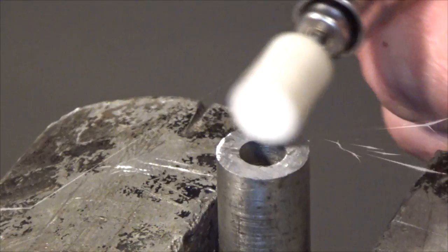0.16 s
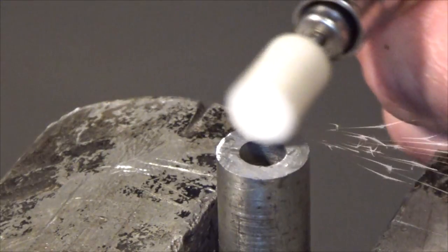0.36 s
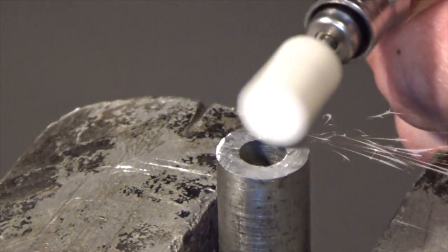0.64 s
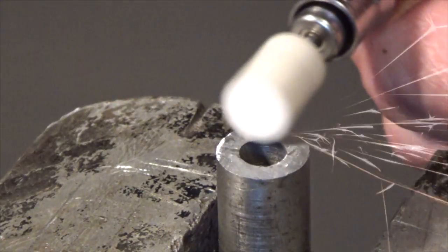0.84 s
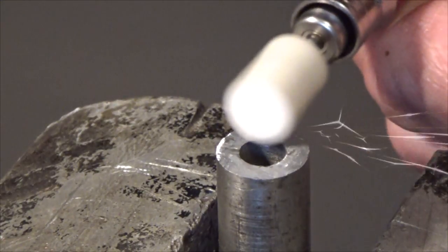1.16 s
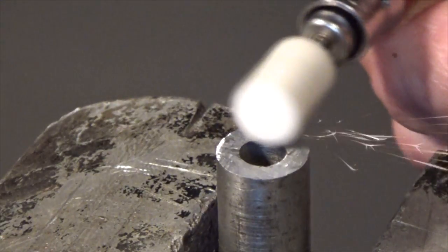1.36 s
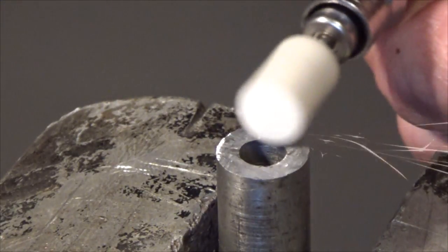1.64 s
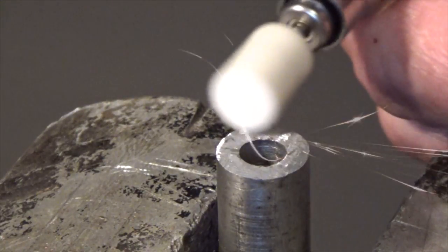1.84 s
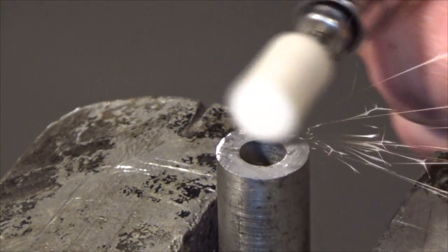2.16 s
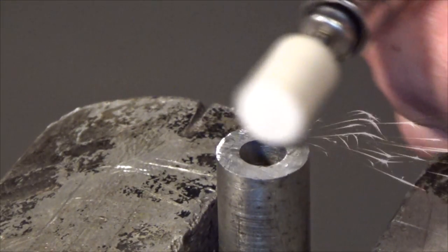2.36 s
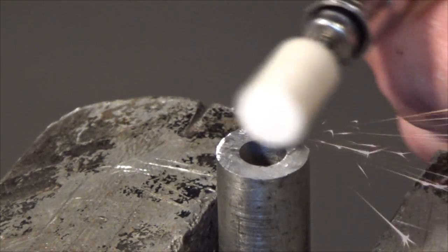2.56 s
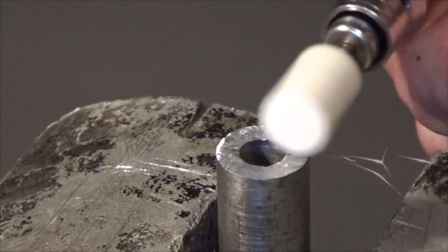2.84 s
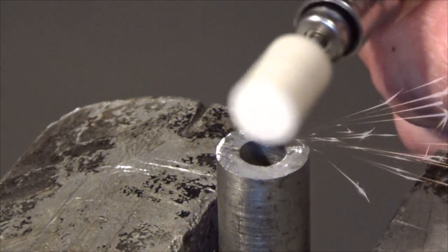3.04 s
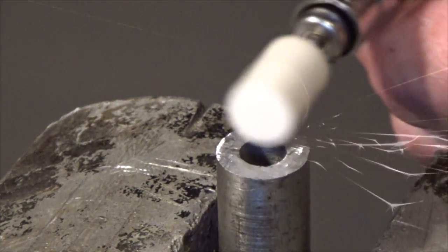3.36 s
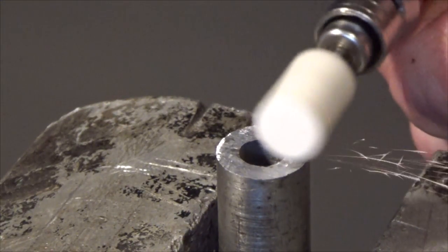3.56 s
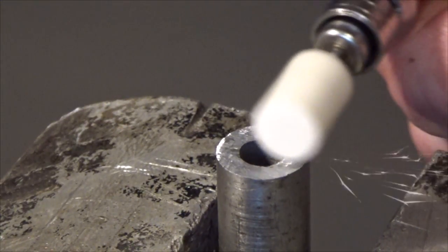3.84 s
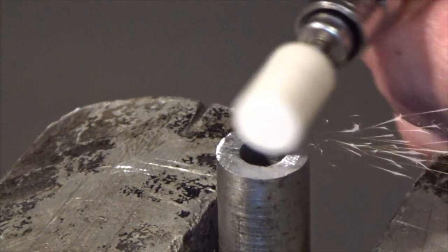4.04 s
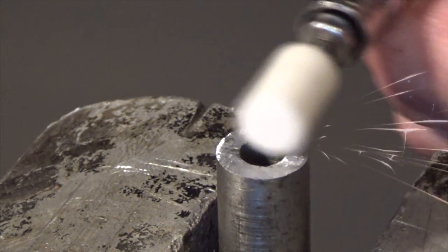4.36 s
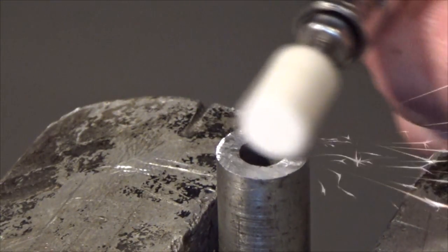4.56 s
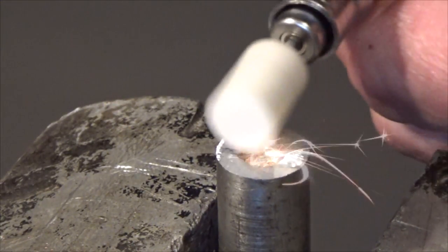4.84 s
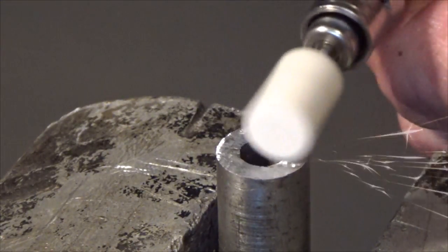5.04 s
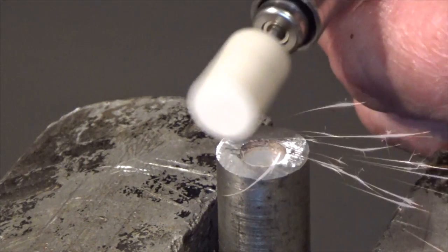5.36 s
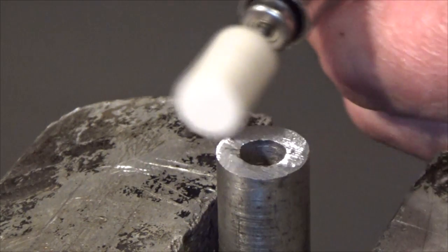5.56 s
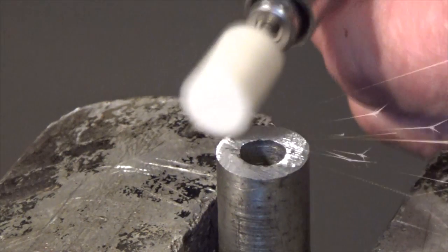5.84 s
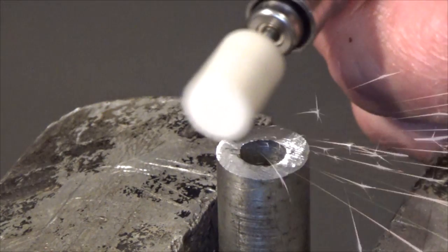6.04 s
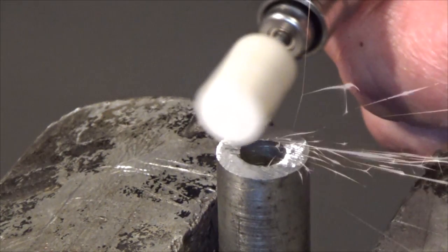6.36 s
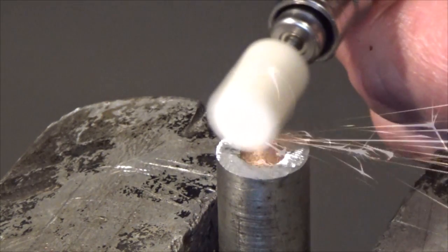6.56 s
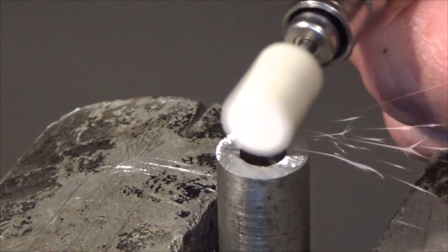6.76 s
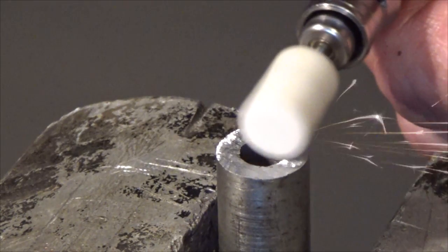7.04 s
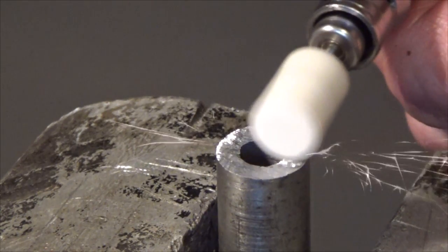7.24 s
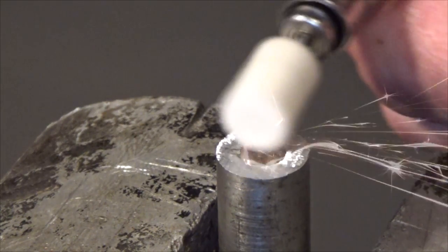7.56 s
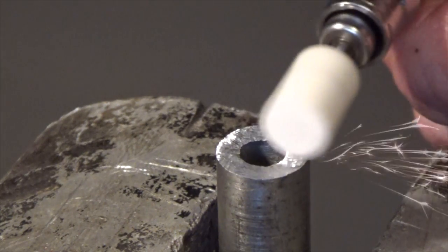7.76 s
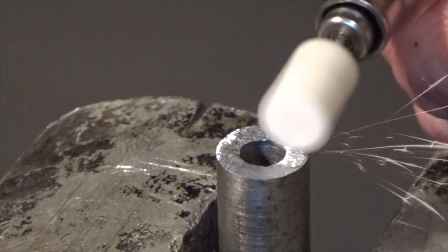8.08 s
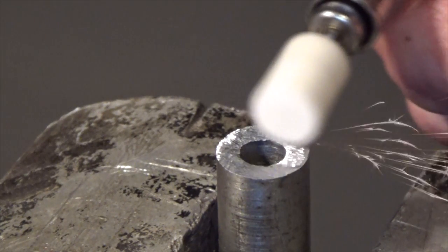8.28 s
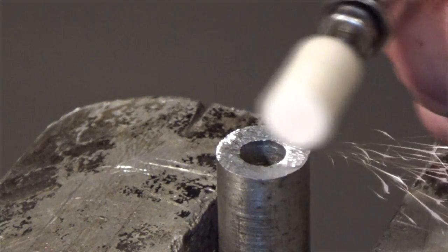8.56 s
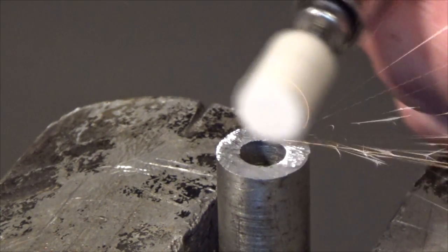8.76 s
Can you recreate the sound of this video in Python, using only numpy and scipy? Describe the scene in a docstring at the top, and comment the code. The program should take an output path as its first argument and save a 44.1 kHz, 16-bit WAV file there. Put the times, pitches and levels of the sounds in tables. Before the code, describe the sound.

Very close in a small workshop, a compressed-air die grinder whines steadily and hisses while its spinning stone scrapes the end of a clamped steel tube. The pitch wavers with hand pressure and the metal rings and squeals thinly. Past the middle the stone lifts, the scraping vanishes and the whine rises cleanly; pressed back hard, it sags and chatters, then recovers to steady grinding.

```python
"""An air die grinder, about 40,000 turns a minute, works its stone over the end of a steel tube in a vice, close by.
The vane motor whines in orders of the spindle speed, and its exhaust hisses in puffs locked to the rotor.
Grit noise scrapes the steel; the stone's high spot knocks once a turn; both drive the resonances of tube and vice.
Speed sets the levels of whine, scrape and knock. The stone lifts off once and the motor runs free;
pressed back hard, it slows and chatters. Room echoes, workshop rumble and dull bumps lie behind."""
import sys
import numpy as np
from scipy import signal
from scipy.fft import rfft, irfft, next_fast_len
from scipy.io import wavfile
from scipy.ndimage import map_coordinates

SR = 44100
rng = np.random.default_rng(int(sys.argv[2]) if len(sys.argv) > 2 else 0)


def master(y):
    """Save y as 16-bit WAV."""
    cut = np.clip(np.atleast_2d(y).T, -1, 1)
    pcm = np.round(cut * 32767)  # scale
    wavfile.write(sys.argv[1], SR, pcm.astype(np.int16))


N = 392931

# workshop rumble, relative spectrum: [f/Hz, density/dB]
RUMBLE_SPECTRUM = [(15, -36), (25, -5), (113, 1), (262, 2), (289, 3.5), (323, 0), (370, -1), (480, -4),
                   (620, -43), (1060, -120)]


def motor(turns, speed, load):
    """Low orders from the rotor and a whistle from the ports: near clean running free, fluttering under load."""
    # orders pass in and out of resonance with speed; levels at t = 0, before waver:
    # [speed/(turns/s), order 1/dB, order 2/dB, order 3/dB, port whistle/dB]
    order_levels = [(620, -43.5, -32, -33.5, -27), (654.7, -37, -28, -31.5, -25.5),
                    (656.4, -34.8, -32, -29, -24), (666.7, -34.5, -28.5, -30.5, -26.5),
                    (682.4, -33.5, -29, -36, -23.5), (685.9, -34, -35.5, -35, -20),
                    (721, -28, -25.5, -30.5, -18)]
    # whistle partials from order 5 up, before the duct, strongest on every third: [level/dB]
    port_levels_db = [-17.5, -20, -23, -20, -10.5, -12.5, -15, -7.5, -14.5, -20, -1.5, -14, -17, -2, -15,
                      -13, -8, -16, -16]
    # exhaust duct's relative colouring of the whistle: [f/Hz, gain/dB]
    duct_response = [(3500, -2), (6000, 1), (7900, 3), (9000, -1), (10700, 2), (12200, -1), (12800, -3),
                     (15000, -6)]
    waver_db, waver_rate_hz = 1.35, 28  # at load 1
    second_fade_db_per_s, whistle_rise_db_per_s = 0.58, 0.1962

    t = np.arange(N) / SR
    speeds, *levels = np.transpose(sorted(order_levels))
    first_db, second_db, third_db, whistle_db = [
        np.interp(speed, speeds, db) + waver_db * load ** 2 * wobble(waver_rate_hz) for db in levels]
    second_db = second_db - second_fade_db_per_s * t
    whistle_db = whistle_db + whistle_rise_db_per_s * t

    whine = amp(first_db) * partial(turns, order=1, flutter=0.13 * load ** 2, rate_hz=75)
    whine += amp(second_db) * partial(turns, order=2, flutter=0.19 * load, rate_hz=170)
    whine += amp(third_db) * partial(turns, order=3, flutter=0.31 * load, rate_hz=35)
    whistle = sum(amp(db) * partial(turns, order=order, flutter=.42 * load, rate_hz=45)
                  for order, db in enumerate(port_levels_db, 5))
    return whine + amp(whistle_db) * coloured(whistle, duct_response)


def partial(turns, order, flutter, rate_hz):
    """One order of the spindle, its strength and phase fluttering in the air stream, at rms 1."""
    carrier = np.exp(2j * np.pi * (order * turns + rng.random()))
    return unit(np.real(carrier * (1 + flutter * (wobble(rate_hz) + 1j * wobble(rate_hz)))))


def exhaust(turns):
    """Spent air leaves in puffs locked to the rotor, and hisses more where it grazes the work."""
    # relative jet spectrum: [f/Hz, density/dB]
    jet_spectrum = [(200, -40), (600, -23), (2000, -17), (4500, -17), (6000, -12), (7200, -5), (8500, -2),
                    (10000, 1), (10900, -1), (11800, 1), (12600, -5), (13400, -5), (14400, -10),
                    (16000, -10)]
    # jet grazes the work while the stone is at the far rim: [start/s, attack/s, end of hold/s, release/s]
    graze_times = (4.8, 0.28, 7, 1.1)
    # relative spectrum of the grazing jet: [f/Hz, density/dB]
    graze_spectrum = [(3000, -33), (5000, -22), (7000, -13), (8500, 8), (9600, 1), (11500, -11), (13300, 0),
                      (15000, -16)]

    puffs = 1 + 0.68 * np.cos(2 * np.pi * turns)
    jet = amp(-22.0 + 0.67 * wobble(16)) * coloured(noise() * puffs, jet_spectrum)
    graze = amp(-27.5) * gate(*graze_times) * coloured(noise() * puffs, graze_spectrum)
    return jet + graze


def grinding(turns, speed, contact):
    """Grit and knocks drive the steel, harder as the spindle is slowed; the cut itself fizzes and squeals."""
    # stone bounces under heavy pressure: [start/s, attack/s, end of hold/s, release/s]
    chatter_times = (6.2, 0.029, 7.22, .45)
    # slow drive levels at working speed, before the bounce terms: [t/s, scrape/dB, knock/dB]
    work_levels = [(0, -25.5, -33), (.4, -24.5, -30), (1.3, -23.5, -31), (2.2, -27, -32), (2.6, -23.5, -29),
                   (4.3, -26.5, -29), (4.8, -26, -27.5), (5.6, -27, -28), (6.1, -27, -28.5),
                   (6.5, -29, -28), (7.05, -22.5, -28.5), (7.5, -26, -29.5), (7.9, -25, -32),
                   (8.9, -26.5, -34.5)]
    # tube and vice resonances, relative: [f/Hz, width/Hz, level/dB]
    steel_modes = [(329, 29, -28.5), (543, 91, -19), (777.6, 51, -13.5), (943, 12.3, -11), (1030, 47, -18),
                   (1545, 77, -8), (1748, 374, -8.5), (1975, 36, -2), (2300, 193, 3), (2423, 87, 1),
                   (2658, 115, 0), (2835, 210, 1), (2972, 81, 4), (3225, 152, 3.5), (3396, 105, 2),
                   (3462, 76, 6), (3512, 58, 2.5), (3677, 190, -3.5), (4064, 85, -1.5), (4840, 130, -31),
                   (4993, 240, -11.5)]
    # relative spectrum of the cut's fizz: [f/Hz, density/dB]
    fizz_spectrum = [(300, -44), (1000, -4.5), (2500, -7.5), (4400, 2), (5100, -8.5), (5500, 6),
                     (7000, 4.5), (8200, -1), (9300, -18), (10200, 0.5), (12100, 12.5), (12700, 7),
                     (15000, -3), (16000, 3.5)]
    # high modes squeal as the stone crosses the rim, before squeal gain: [t/s, length/s, level/dB]
    squeal_events = [(0.28, 0.072, -28), (0.645, 0.088, -29), (0.994, 0.085, -28), (1.39, 0.081, -29),
                     (1.66, 0.036, -28), (2.432, 0.28, -27), (2.777, 0.13, -24), (3.167, 0.31, -24),
                     (3.576, 0.1, -23), (3.792, 0.28, -25), (4.26, 0.18, -23), (4.631, 0.12, -28),
                     (5.073, 0.076, -30), (7.117, 0.24, -24), (7.453, 0.036, -29), (7.718, 0.14, -26),
                     (8.027, 0.086, -22), (8.375, 0.27, -22)]
    # high singing modes of the tube, relative: [f/Hz, width/Hz, level/dB]
    singing_modes = [(14170, 480, 0), (14620, 230, -2)]
    working_speed = 672  # turns/s
    bounce_calm, bounce_hard = 0.27, 0.97  # share by which alternate knocks shrink and grow
    scrape_db_per_turn_lost, knock_db_per_turn_lost = .085, 0.02  # per turn/s lost
    bounce_scrape_db, bounce_knock_db, bounce_sing_db = -4.5, 4, -5  # at bounce 1
    fizz_db, sing_db, squeal_gain_db = -23.5, -33.5, -1  # sing_db: between squeals, at bounce 0

    lost = working_speed - speed
    bounce = bounce_calm + (bounce_hard - bounce_calm) * gate(*chatter_times)
    scrape_slow_db, knock_slow_db = curves(work_levels)
    # a bouncing stone scrapes less and knocks more
    scrape_db = scrape_slow_db + scrape_db_per_turn_lost * lost + bounce_scrape_db * bounce
    knock_db = knock_slow_db + knock_db_per_turn_lost * lost + bounce_knock_db * bounce + wobble(14)

    touch = contact * judder(rate_hz=124, depth=.36)
    cut = touch * grit(turns, spiky_db=0.5, bite=0.65)
    blows = touch * knocks(turns, bounce, scatter_db=1.8, jitter_turns=.010)
    drive = amp(scrape_db) * cut + amp(knock_db) * blows
    body = np.std(drive) * resonate(drive, steel_modes)
    fizz = amp(fizz_db) * coloured(cut + 0.68 * bounce * blows, fizz_spectrum)

    steady_sing = amp(sing_db + bounce_sing_db * bounce)  # bouncing damps the high modes
    squeals = amp(squeal_gain_db) * swells(squeal_events, edge_s=.06)
    rim_cut = touch * grit(turns, spiky_db=0, bite=0.37)
    singing = np.hypot(steady_sing, squeals) * resonate(rim_cut, singing_modes)
    return body + fizz + singing


def grit(turns, spiky_db, bite):
    """Countless grains cut the steel, hardest once a turn and in uneven flurries."""
    grains = noise() * amp(spiky_db * noise())
    flurries = amp(1.7 * wobble(600) + 1.2 * wobble(110))
    return unit(grains * np.exp(bite * np.cos(2 * np.pi * turns)) * flurries)


def knocks(turns, bounce, scatter_db, jitter_turns):
    """One blow a turn from the stone's high spot; bounce weakens every second one and strengthens the rest."""
    count = np.arange(1, int(turns[-1]))
    chance = rng.standard_normal((len(count), 2))
    at = np.interp(count + jitter_turns * chance[:, 0], turns, np.arange(N))
    at = np.clip(at, 0, N - 2)
    whole = at.astype(int)
    late = at - whole
    missed = np.clip(bounce[whole], 0, 1)
    alternation = (1 + missed * (-1) ** count) / np.hypot(1, missed)  # keeps mean power
    size = amp(scatter_db * chance[:, 1]) * alternation
    # each impulse is split between its two nearest samples
    return unit(np.bincount(whole, size * (1 - late), N) + np.bincount(whole + 1, size * late, N))


def judder(rate_hz, depth):
    """The hand-held tool bobs on the steel at a wandering rate, now more and now less."""
    cycles = np.cumsum(rate_hz * (1 + .07 * wobble(7))) / SR
    return unit(1 + depth * (1 + .4 * wobble(4)) * np.cos(2 * np.pi * cycles))


def tube(contact, unrest_db):
    """Friction rings the main mode at a fairly even swing, flaring when it catches; it needs firm contact."""
    # main mode, relative: [f/Hz, width/Hz, level/dB]
    main_mode = [(3091, 40, 0)]
    # mode catches and rings out: [t/s, length/s, level/dB]
    flare_events = [(0.552, 0.04, -23), (0.958, 0.048, -26), (1.04, 0.03, -21), (1.11, 0.035, -25),
                    (1.31, 0.11, -26), (2.075, 0.14, -23), (3.09, 0.033, -22), (3.397, 0.056, -26),
                    (3.835, 0.038, -23), (4.195, 0.055, -22), (4.434, 0.074, -28), (4.63, 0.043, -19.5),
                    (5.907, 0.067, -22), (6.652, 0.12, -20.5), (6.947, 0.034, -18), (7.515, 0.039, -23),
                    (7.782, 0.106, -19), (8.024, 0.1, -21), (8.17, 0.081, -20), (8.52, 0.028, -25),
                    (8.685, 0.069, -24.5), (8.817, 0.1, -23)]

    swing = signal.hilbert(resonate(noise(), main_mode))
    even = unit(swing.real / np.abs(swing) ** 0.41)  # envelope partly flattened
    steady = amp(-28 + unrest_db * wobble(30))
    return contact ** 2 * np.hypot(steady, swells(flare_events, edge_s=0.016)) * even


def room(x, t60_s, drift_hz):
    """Bench and walls answer briefly in decaying noise; the echo pattern shifts as the hand moves."""
    t = np.arange(SR // 4) / SR
    tails = rng.standard_normal((4, len(t))) * amp(-60 * t / t60_s)
    echoes = signal.fftconvolve(x[None], tails / np.linalg.norm(tails[0]), axes=1)[:, :N]
    shares = np.array([wobble(drift_hz) for _ in tails])
    return np.sum(echoes * shares, axis=0) / np.linalg.norm(shares, axis=0)


def shop():
    """Low workshop rumble of unsteady filtered noise, with a few dull noise bumps."""
    # soft low bumps: [t/s, level/dB]
    bump_events = [(.25, -42), (4.383, -44), (4.745, -40), (5.39, -45), (5.905, -47), (6.075, -42),
                   (7.48, -41), (8.425, -45)]
    bump_width_s = 0.0069

    t = np.arange(N) / SR
    swell = sum(amp(db) * np.exp(-((t - s) / bump_width_s) ** 2) for s, db in bump_events)
    bumps = swell * coloured(noise(), [(25, -21), (70, 4), (150, -2), (300, 1), (700, -23)])
    unrest_db = 1.1 * wobble(8) + 1.6 * wobble(70)
    return amp(-56.5 + unrest_db) * coloured(noise(), RUMBLE_SPECTRUM) + bumps


def amp(db):
    """Amplitude factor of a level in dB."""
    return 10 ** (np.asarray(db) / 20)


def unit(x):
    """x scaled to rms 1."""
    return x / np.sqrt(np.mean(np.abs(x) ** 2) + 1e-20)


def noise():
    """White Gaussian noise at rms about 1."""
    return rng.standard_normal(N)


def curves(rows):
    """One value per sample for each column after the time."""
    s, *cols = np.transpose(rows)
    return [np.interp(np.arange(N) / SR, s, c) for c in cols]


def wobble(rate_hz):
    """A smooth random curve, rate_hz knots a second."""
    knots = rng.standard_normal(N // 8)
    return map_coordinates(knots, [np.arange(N) * rate_hz / SR], mode="wrap")


def gate(start_s, attack_s, end_s, release_s):
    """Rises from 0 to 1, holds, and falls back."""
    t = np.arange(N) / SR
    return np.clip(np.minimum((t - start_s) / attack_s, 1 - (t - end_s) / release_s), 0, 1)


def swells(rows, edge_s):
    """Summed gain of [t/s, length/s, level/dB] events with linear edges."""
    return sum(amp(db) * gate(s - edge_s / 2, edge_s, s + length - edge_s / 2, edge_s)
               for s, length, db in rows)


def filtered(x, response):
    """x times a complex response of frequency."""
    m = next_fast_len(N + SR // 2)
    return irfft(rfft(x, m) * response(np.fft.rfftfreq(m, 1 / SR)), m)[..., :N]


def coloured(x, points):
    """x through a [f/Hz, level/dB] spectrum, at rms 1."""
    f, db = np.transpose(points)
    return unit(filtered(x, lambda hz: amp(np.interp(np.log(hz + 1), np.log(f), db))))


def resonate(x, modes):
    """x through [f/Hz, width/Hz, level/dB] resonances with steep skirts, at rms 1."""
    def response(f):
        return sum(amp(db) * (1j * f * w / (c * c - f * f + 1j * f * w)) ** 2 for c, w, db in modes)
    return unit(filtered(x, response))


def scene():
    """Nearly mono stereo: a weak side signal, a quarter cycle out of phase, widens the mid."""
    # spindle speed, sagging with each push of the hand: [t/s, speed/(turns/s)]
    speed_points = [(0.0, 688), (0.55, 673), (0.62, 684), (0.69, 659), (0.85, 684), (0.96, 667),
                    (1.09, 681), (1.78, 666), (2.08, 674), (2.1, 664), (2.42, 675), (2.5, 658), (3.02, 669),
                    (3.06, 682), (3.34, 659), (3.51, 681), (4.09, 659), (4.21, 678), (4.39, 671),
                    (4.58, 692), (4.77, 659), (4.94, 688), (5.14, 669), (5.36, 682), (5.53, 671),
                    (5.69, 715), (5.91, 713), (5.94, 685), (6.03, 685), (6.1, 646), (6.2, 675), (6.25, 628),
                    (6.38, 641), (6.41, 627), (6.62, 645), (6.84, 639), (6.88, 651), (7.18, 644),
                    (7.26, 656), (7.55, 652), (7.62, 676), (7.71, 657), (8.37, 683), (8.41, 667),
                    (8.48, 682), (8.71, 665), (8.8, 685), (8.89, 654)]
    # stone leaves the steel: [start/s, time to clear/s, return/s, time to bite again/s]
    lift_times = (5.605, 0.075, 5.902, 0.0062)
    # side level relative to mid: [f/Hz, level/dB]
    side_response = [(100, -57), (670, -23), (1300, -62), (2500, -24.5), (3500, -34.5), (8000, -26),
                     (11000, -25), (14000, -69)]
    free_speed, full_load_sag = 720, 45  # turns/s
    shake_slow, shake_fast = .002, .0012  # share of speed, at load 1
    lift_db = -23  # contact left in the air

    speed = curves(speed_points)[0]
    load = np.clip((free_speed - speed) / full_load_sag, .2, 1.3)
    # the harder the stone is pressed, the more its speed shakes
    shake = load * (shake_slow * wobble(20) + shake_fast * wobble(45))
    turns = np.cumsum(speed * (1 + shake)) / SR
    contact = amp(lift_db * gate(*lift_times))

    direct = motor(turns, speed, load) + exhaust(turns)
    direct += grinding(turns, speed, contact) + tube(contact, unrest_db=2.0)
    mid = direct + amp(-10) * room(direct, t60_s=.17, drift_hz=3) + shop()
    hz, db = np.transpose(side_response)
    side = filtered(mid, lambda f: 1j * amp(np.interp(np.log(f + 1), np.log(hz), db)))
    side += amp(-67.5) * coloured(noise(), RUMBLE_SPECTRUM)
    return np.array([mid + side, mid - side])


def record(dry):
    """Rounds off the tallest peaks and keeps nothing above the band limit."""
    top_hz = 15750
    rounded = dry / (1 + np.abs(dry / .8) ** 6) ** (1 / 6)
    return filtered(rounded, lambda hz: hz < top_hz)


dry = scene()
out = record(dry)
master(out)
```